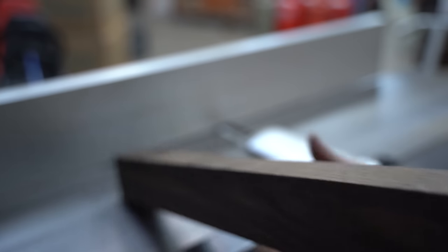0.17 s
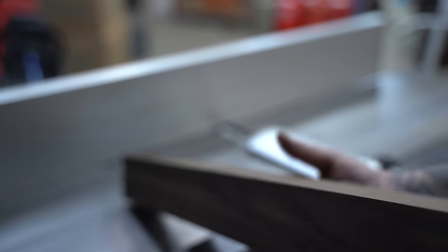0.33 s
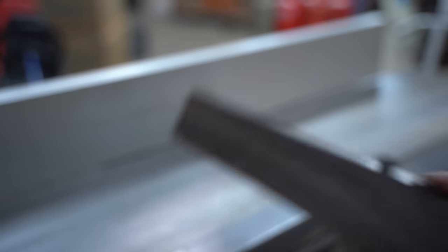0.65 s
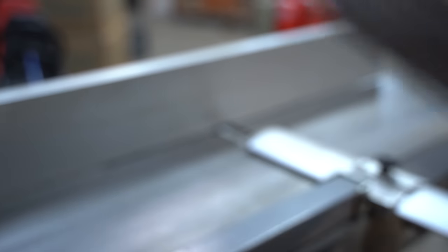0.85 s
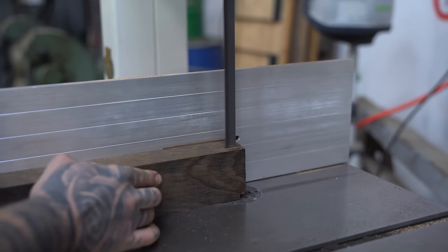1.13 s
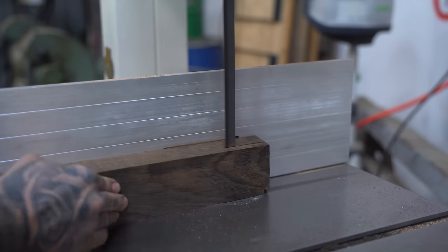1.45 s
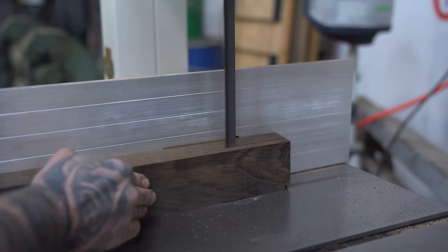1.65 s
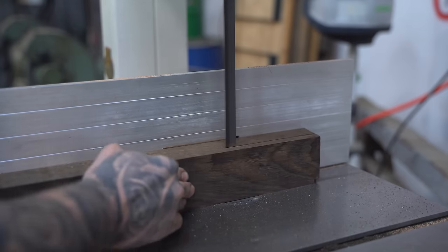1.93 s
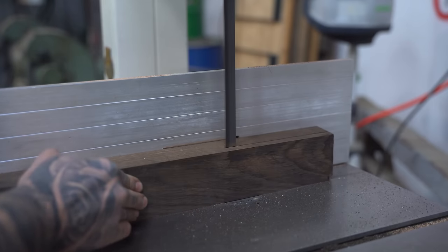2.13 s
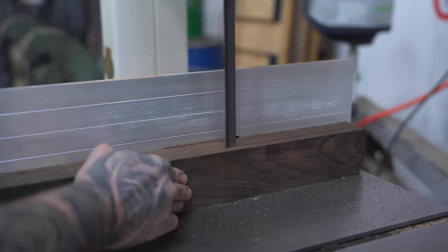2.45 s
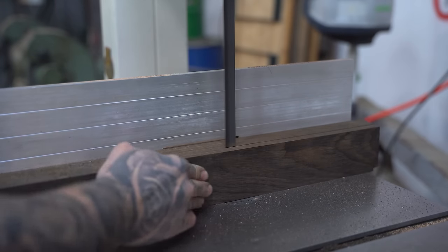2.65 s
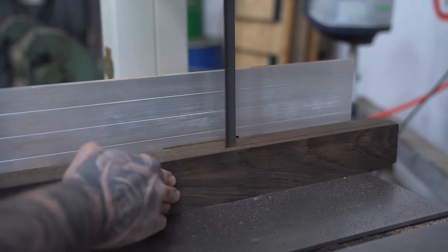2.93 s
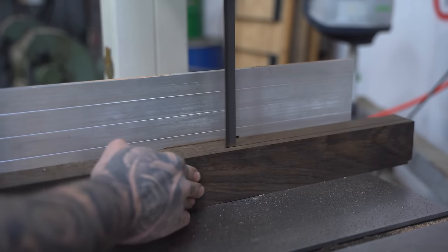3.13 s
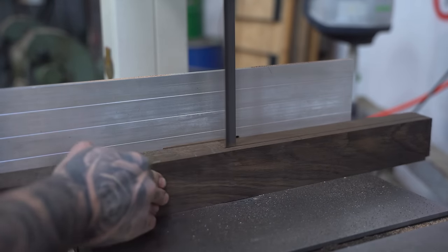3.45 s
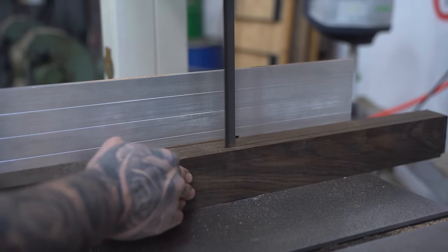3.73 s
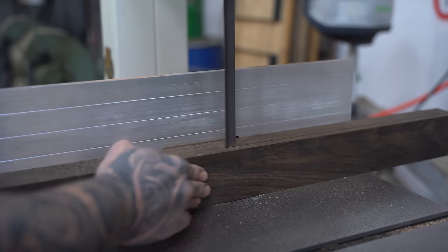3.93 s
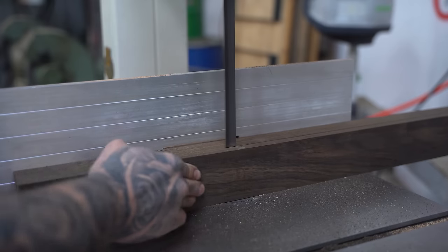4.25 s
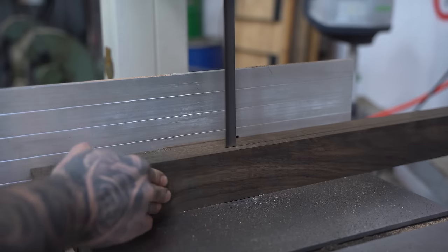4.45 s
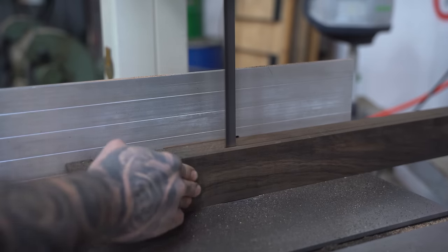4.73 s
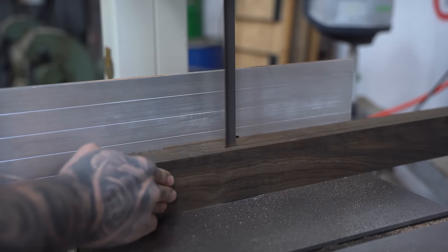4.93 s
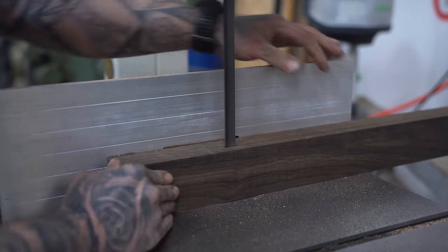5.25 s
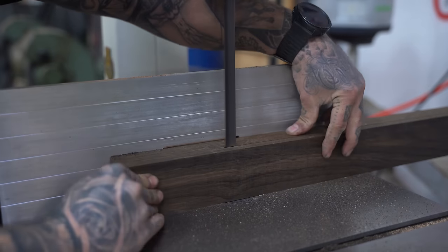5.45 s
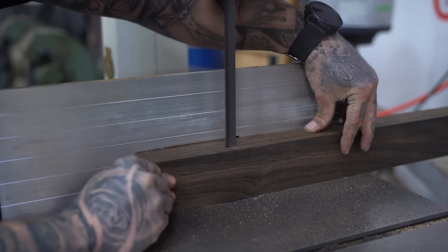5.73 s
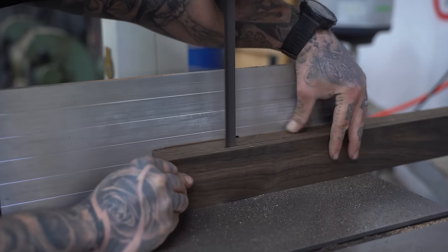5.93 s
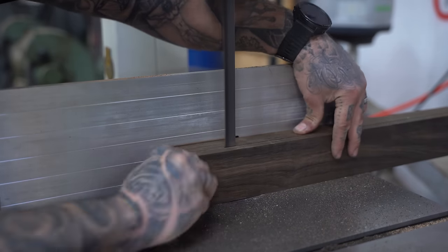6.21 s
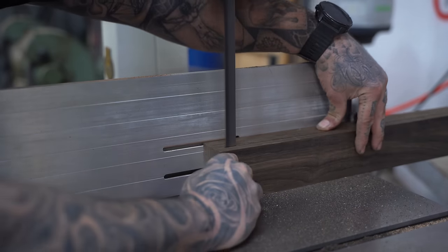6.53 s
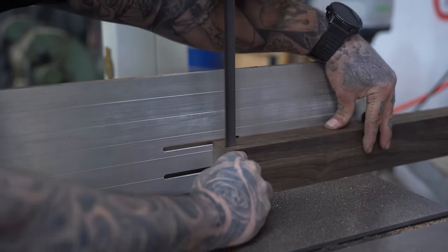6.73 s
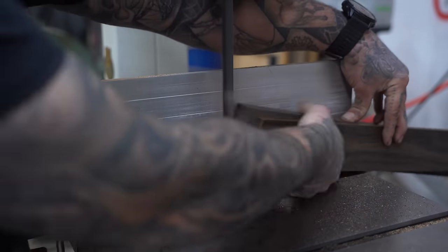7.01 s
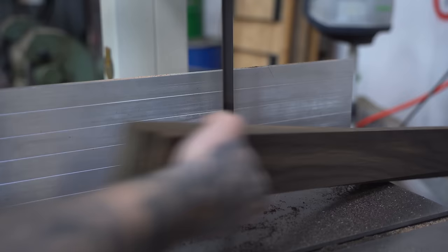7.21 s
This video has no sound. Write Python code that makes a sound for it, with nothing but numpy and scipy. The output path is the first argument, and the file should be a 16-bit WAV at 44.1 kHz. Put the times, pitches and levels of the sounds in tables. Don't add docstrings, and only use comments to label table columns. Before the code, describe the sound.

For the first 1.15 seconds a workshop extractor hums quietly and widely, with airy noise, faint unsteady whines and a duct boom swelling from about 0.6. Then it cuts abruptly to a much closer, nearly central bandsaw. Its teeth scrape a hardwood board with a bright, dense rasp, a singing blade near 6 kHz, hissing guides and spitting chips. Two harder bites in every blade turn make a fast, regular ticking flutter. Pushes are separated by short dips near 1.5, 2.1, 2.7, 3.3, 3.8, 4.0, 4.4 and 4.9, with slight chirps and a lingering whistle; faint board moans glide beneath. From 5.15 to 5.5 the cut eases and snags roughly during a grip change, and low blade hum blooms. Softer-ticking strokes continue, dipping at 5.9 and 6.3. Around 6.8 the scrape falls away, leaving rushing air, wheels and wavering motor tones until the end, about 7.4.

```python
import sys
import numpy as np
from scipy import signal
from scipy.fft import rfft, irfft, next_fast_len
from scipy.io import wavfile
from scipy.ndimage import uniform_filter1d

SR = 44100
rng = np.random.default_rng(int(sys.argv[2]) if len(sys.argv) > 2 else 0)


def gain_from_db(level_db):
    decades = np.asarray(level_db, float) / 20
    return 10 ** decades


def waveform_to_disk(signal):
    frames = np.transpose(np.atleast_2d(signal))
    scaled = np.clip(frames, -1, 1) * 32767
    samples = np.round(scaled).astype(np.int16)
    wavfile.write(sys.argv[1], SR, samples)


N = 325105
PADDED = next_fast_len(N + 4096)

# frequency in Hz, density in dB per Hz.
SHOP_AIR = [(24, -73), (40, -65), (91, -17), (379, -9.5), (1060, -13.5), (1290, -7), (1580, -11),
            (1790, -16.5), (1970, -27), (2290, -16.5), (2600, -15), (3090, -18), (4070, -14), (6230, -22),
            (15700, -38)]
# frequency in Hz, level in dB.
SHOP_WHINES = [(371.4, -69.5), (1297, -65), (1986, -67), (2019, -64.5), (2692, -69.5), (3973, -63),
               (4963, -69), (7940, -75)]
# time in seconds, level in dB.
DUCT_SWELL = [
    (0.0, -60),
    (0.4, -59),
    (0.63, -52.5),
    (1.14, -52.5),
]
# frequency in Hz, likeness from -1 to 1.
SHOP_LIKENESS = [(300, .98), (600, .76), (1000, .48), (2000, .3), (3100, .2), (4200, .45), (6000, .12),
                 (15000, .15)]
# frequency in Hz, balance in dB.
SHOP_BALANCE = [(60, -1), (180, 0), (550, 2.5), (1650, 3), (4970, 0.5), (15000, 5)]

# frequency in Hz, density in dB per Hz.
IDLE_AIR = [(35, -97), (60, -54), (455, -21.5), (549, -36), (588, -48), (676, -17.5), (895, -14),
            (1640, -6), (2550, -6), (2740, -9), (5380, -10), (8180, -8), (15700, -14.5)]
# frequency in Hz, likeness from -1 to 1.
SAW_LIKENESS = [(100, 0.99), (300, 1), (4400, 0.99), (5800, 0.71), (10600, 0.78), (12200, 0.47),
                (14200, 0.62), (15300, .4)]
# frequency in Hz, waver in Hz, flutter in dB, level in dB,
# share of pitch lost under load.
MOTOR_TONES = [(421, 3.74, 2.5, -84, 0.0018), (453, 9.95, 3.5, -82.5, 0), (489, 5.97, 5, -83.5, 0.0028),
               (601.6, .3, -2.2, -74.5, 0.00066), (929, 2.86, 3.5, -71.5, 0.038), (1284, 5, 2.5, -73, .03),
               (1197, 0.81, 4, -71, 0.00093), (2004, 2.15, 0, -67.5, 0), (2126, 2.1, -4, -79, 0.0038),
               (2320, 4.8, 3, -68, 0.0013), (2574, 2.4, 1.8, -64, 0.00037), (797, 3.6, 1.5, -83.5, 0.0018),
               (15640, 30, -5, -73, 0.004), (4240, 3.8, 9, -78.5, 0), (8150, 15, 3.5, -70.5, 0.0049),
               (11978, 5, 3, -84.5, 0), (12300, 5.8, 1, -76, 0.0057)]

# start in seconds, blade song above its rule in dB,
# climb of the song over the stroke in dB, scrape level in dB, pan in dB.
STROKES = [(1.15, 3, -5, -35, .3), (1.5, 0, -5, -36, 0), (2.14, -2, 8, -34, 1), (2.74, 1.5, -6, -34, -.7),
           (3.3, -1, 1, -35.5, 0), (3.82, -5, 9, -37.5, -0.5), (4.02, -3, -4, -36, -.5),
           (4.42, 2, 6, -35, -.5), (4.9, -2, -5, -35.5, -1.5), (5.4, -1, 12, -36.5, -1.5),
           (5.95, -1.5, -4, -36, -1.5), (6.31, -3, 0, -35, -1.5)]
# time in seconds, push as board level in dB, chip spray in dB,
# pitch of the contact on the guides in Hz.
FEED = [(1.15, -47.5, -31, 7400), (1.3, -42.5, -36.5, 7430), (1.43, -41, -37, 7500),
        (1.68, -40.5, -38, 7550), (2.08, -45, -33, 7470), (2.45, -46, -36, 8130), (2.8, -45, -37.5, 7600),
        (3.24, -45.5, -34, 7480), (3.75, -45.5, -32, 7150), (4.2, -41, -37, 6650), (4.5, -46, -36, 7500),
        (5.12, -46, -32.5, 7620), (5.55, -47, -36.5, 8100), (5.87, -42.5, -38, 7720),
        (6.08, -41, -39.5, 7170), (6.25, -44.5, -39.5, 7130), (6.4, -39, -37, 7560),
        (6.74, -51.5, -34.5, 6950)]
# pressure eases in seconds, back in full in seconds, rise in seconds,
# depth in dB, blade ring in dB.
PAUSES = [(1.445, 1.537, 0.043, -15.5, -48), (2.111, 2.176, 0.04, -11.5, -43),
          (2.707, 2.768, 0.031, -11.5, -66), (3.259, 3.32, 0.014, -16, -53),
          (3.769, 3.833, 0.0067, -17, -52.5), (3.991, 4.052, 0.033, -7, -73),
          (4.373, 4.443, 0.028, -12.5, -64), (4.865, 4.919, 0.014, -14, -52.5),
          (5.145, 5.306, 0.11, -12.5, -71.5), (5.273, 5.501, 0.068, -20.5, -62),
          (5.906, 5.982, .025, -4.5, -70), (6.266, 6.321, 0.0084, -17.5, -53)]
# (seconds, seconds, seconds, dB, dB).
CUT_END = (6.788, 7.6, .1, -32, -50)
# time in seconds, level in dB, half length in seconds.
SNAGS = [
    (5.198, 3, .006),
    (5.219, 5, .006),
    (5.248, 9, .007),
    (5.325, 8, .004),
    (5.419, 13, .01),
    (5.458, 8, .009),
    (5.485, 2, .006),
    (5.537, 2, .007),
]

# frequency in Hz, density in dB per Hz.
CUT_BED = [(410, -66), (700, -60), (1210, -9.5), (1880, -15.5), (2510, -4), (3520, -10), (5760, -13.5),
           (6310, -17), (7480, 3), (9450, -3.5), (15700, -2.5)]
# frequency in Hz, width in Hz, level in dB, share of a pause felt.
BOARD_LOW = [(1090, 60, -8, .5), (1230, 70, -9, .5), (2330, 140, -6, .7)]
# frequency in Hz, width in Hz, level in dB, share of a pause felt.
BOARD_HIGH = [(3305, 58, 0, 0.37), (4510, 210, 0, 0.68), (4973, 114, 2, 1), (5150, 80, 2, 1)]
# frequency in Hz, width in Hz, level in dB, share of a pause felt.
GUIDES = [(7000, 88, 14.5, 0.84), (7150, 87, 12, 1), (7313, 84, 10.5, 1), (7600, 62, -13, 0.87),
          (7970, 130, 11, 0.94), (8124, 103, 14.5, 0.88), (10320, 480, -4.5, 0.42), (11370, 205, 2, 1)]
# frequency in Hz, width in Hz, level in dB, share of a pause felt.
CHIPS = [(13620, 200, 5, 1), (14200, 420, 12, 1), (15600, 350, 8, 1)]
# frequency in Hz, width in Hz, level in dB,
# gain in dB when the board is held from behind, peak of that gain in seconds.
BLADE_HUM = [(1712, 23, -65.5, 10, 5.83), (2554, 23, -63.5, 12, 5.63)]
# frequency in Hz, width in Hz, depth from 0 to 1.
HOLLOWS = [(1885, 150, .7), (2140, 100, .45), (2790, 200, .6), (3480, 220, .75), (3750, 120, .4),
           (6350, 400, .3), (9750, 600, .3), (12600, 700, .3)]
# frequency in Hz, level in dB, share of the sag.
FREE_BLADE = [(1725, -2, 1), (2580, -6, .2)]
# start in seconds, length in seconds, from Hz, to Hz, level in dB.
MOANS = [
    (1.92, 0.11, 240, 236, -92),
    (2.298, 0.58, 240.4, 402, -86.5),
    (3.133, 0.38, 274, 315, -85.5),
    (3.616, 0.16, 290, 277, -91),
    (4.036, .14, 237, 225, -85),
]


def rms_one(x):
    return x / np.sqrt(np.mean(x ** 2) + 1e-20)


def in_time(rows):
    s, *columns = np.transpose(rows)
    return [np.interp(np.arange(N) / SR, s, c) for c in columns]


def drift(rate):
    r = np.exp(-80 * np.pi * rate / SR)
    white = rng.standard_normal(N // 40 + 2002)
    slow = signal.lfilter([1], [1, -2 * r, r * r], white)[2000:]
    return np.interp(np.arange(N) / 40, np.arange(len(slow)), rms_one(slow - slow.mean()))


def on_bins(points):
    hz = np.maximum(np.fft.rfftfreq(PADDED, 1 / SR), 1)
    return np.interp(np.log(hz), np.log(np.array(points)[:, 0]), np.array(points)[:, 1])


def colour(x, gain):
    return irfft(rfft(x, PADDED) * gain, PADDED)[..., :N]


def spread(pair, likeness, lag_s):
    alike = np.clip(on_bins(likeness), -1, 1)
    mid, side = rfft(pair, PADDED) * np.sqrt([1 + alike, 1 - alike]) / np.sqrt(2)
    late = np.exp(-2j * np.pi * np.fft.rfftfreq(PADDED, 1 / SR) * lag_s)
    return irfft([mid + side, (mid - side) * late], PADDED)[:, :N]


def resonance(x, hz, width_hz):
    r = np.exp(-np.pi * width_hz / SR)
    zeros = np.array([1, 0, -1]) * (1 - r * r) / 2
    return signal.lfilter(zeros, [1, -2 * r * np.cos(2 * np.pi * hz / SR), r * r], x)


def gliding(x, hz, width_hz):
    turn = np.exp(2j * np.pi * np.cumsum(hz) / SR)
    r = np.exp(-np.pi * width_hz / SR)
    return 2 * np.real(turn * signal.lfilter([1 - r], [1, -r], x * np.conj(turn)))


def band(x, lo_hz, hi_hz):
    sos = signal.butter(3, [lo_hz, min(hi_hz, .45 * SR)], "band", fs=SR, output="sos")
    return signal.sosfilt(sos, x)


def shop():
    air = gain_from_db(-49) * rms_one(colour(rng.standard_normal((2, N)), gain_from_db(on_bins(SHOP_AIR))))
    boom = gain_from_db(in_time(DUCT_SWELL)[0] - 4.5) * rms_one(resonance(rng.standard_normal((2, N)), 362, 61))
    white = rng.standard_normal((2, N))
    whines = sum(gain_from_db(db) * rms_one(resonance(white, hz, 3.1)) for hz, db in SHOP_WHINES)
    balance = gain_from_db(on_bins(SHOP_BALANCE) / 2 * [[1], [-1]])
    return colour(spread(air + boom + whines, SHOP_LIKENESS, lag_s=8 / SR), balance)


def idling(load):
    air = rms_one(colour(rng.standard_normal((2, N)), gain_from_db(on_bins(IDLE_AIR))))
    out = gain_from_db(-52 + 1.2 * drift(13)) * air
    for hz, waver_hz, flutter_db, db, sag in MOTOR_TONES:
        phase = 2 * np.pi * np.cumsum(hz * (1 - sag * load) + waver_hz * drift(10.6)) / SR
        out[0] += np.sqrt(2) * gain_from_db(db + flutter_db * drift(9.9)) * np.sin(phase)
    return out


def strokes():
    t = np.arange(N) / SR
    start, song_db, climb_db, *columns = np.transpose(STROKES)
    which = np.clip(np.searchsorted(start, t) - 1, 0, len(start) - 1)
    progress = np.interp(t, [*start, CUT_END[0]], np.arange(len(start) + 1)) % 1
    levels = [song_db[which] + climb_db[which] * (progress - .5)] + [c[which] for c in columns]
    return [uniform_filter1d(c, size=2000) for c in levels] + [np.sin(np.pi * progress)]


def teeth(proud_db, second_db, fade_s, rough_db, grain_db):
    t = np.arange(N) / SR
    turn_s = 1 / 17.675
    since = (t - 1.1645) % turn_s
    half = 0.44 * turn_s
    first = proud_db * np.exp(-since / fade_s)
    second = second_db * np.exp(-(since - half) / fade_s)
    bite_db = np.where(since < half, first, second)
    bite_db *= np.clip(1 + .3 * drift(6), .3, 1.4)
    bite_db *= np.interp(t, [5.2, 5.5], [1, .5])
    tick_db = bite_db * .3 * (since < .0012)
    level_db = bite_db + tick_db + rough_db * drift(8.4) + grain_db * drift(300)
    return gain_from_db(level_db) * rng.standard_normal((2, N))


def body(scrape, modes, bed, lost_db, patchy_db, favour_db=lambda hz: 0):
    rings = [gain_from_db(db + favour_db(hz) + patchy_db * drift(5.7)) * resonance(scrape, hz, width_hz)
             for hz, width_hz, db, felt in modes]
    loudness = uniform_filter1d(np.mean((bed + sum(rings)) ** 2, axis=0), size=12000)
    eased = sum(gain_from_db(mode[3] * lost_db) * ring for ring, mode in zip(rings, modes))
    return (gain_from_db(lost_db) * bed + eased) / np.sqrt(loudness)


def board_tones(scrape, bed, board_db, lost_db):
    def hard_push(hz):
        return (hz > 4700) * np.minimum(1.26 * (board_db + 47.5), 7)

    low = body(scrape, BOARD_LOW, gain_from_db(1.0) * band(bed, 940, 3300), lost_db, patchy_db=3.0)
    high = body(scrape, BOARD_HIGH, gain_from_db(10) * band(bed, 2926, 5620), lost_db, 2.44, hard_push)
    return gain_from_db(-53.0 + 0.1 * (board_db + 54.5)) * low + gain_from_db(board_db) * high


def blade_song(scrape, bed, board_db, extra_db, arch, lost_db):
    push_db = board_db + 47
    song_db = -46 + 0.97 * push_db + 3 * arch + extra_db
    song_hz = 5950 - 12 * push_db - 70 * arch
    line = gliding(gliding(scrape, song_hz + 15 * drift(20), 45), song_hz, 220)
    breath = gain_from_db(-3.5 + 0.55 * push_db) * rms_one(band(bed, 5674, 6160))
    return gain_from_db(song_db + 2.0 * lost_db) * rms_one(breath + rms_one(line))


def guide_scrape(scrape, bed, contact_hz, lost_db):
    def nearness(hz):
        return (hz < 9000) * np.maximum(-9 * ((hz - contact_hz) / 400) ** 2, -15)

    hiss = gain_from_db(5) * band(bed, 6460, 12470) + gain_from_db(-5) * band(scrape, 7230, 8020)
    return body(scrape, GUIDES, hiss, lost_db, 5.9, nearness)


def chip_spray(scrape, bed, chips_db, lost_db):
    def thick_spray(hz):
        return (hz < 15000) * 0.63 * (chips_db + 41.5)

    bursts = scrape * gain_from_db(2.9 * drift(65))
    return body(bursts, CHIPS, gain_from_db(14) * band(bed, 12900, 16500), lost_db, 2.2, thick_spray)


def blade_whistle(scrape, scrape_db, lost_db):
    hz = 8310 - 7 * np.maximum(lost_db, -14) + 35 * drift(7)
    whistle = rms_one(band(gliding(scrape, hz, 49), 7780, 8610))
    deep_pause_db = 1.4 * np.minimum(lost_db + 14.5, 0)
    level_db = scrape_db - 12.5 + 2.3 * drift(4) + 0.12 * lost_db + deep_pause_db
    return whistle * gain_from_db(level_db) * (np.arange(N) / SR < 6.81)


def blade_hum(scrape, lost_db):
    t, hum = np.arange(N) / SR, 0
    pause_shares = (0.25, 0)
    for (hz, width_hz, db, held_db, peak_s), feels in zip(BLADE_HUM, pause_shares):
        clamp_db = held_db * np.exp(-((t - peak_s) / 0.38) ** 2)
        tone = rms_one(resonance(resonance(scrape, hz, width_hz), hz, 100))
        hum = hum + gain_from_db(db + clamp_db + feels * lost_db + 0.57 * drift(2.9)) * tone
    return hum


def cut(lost_db):
    board_db, chips_db, contact_hz = in_time(FEED)
    extra_db, scrape_db, pan_db, arch = strokes()
    scrape = teeth(proud_db=3.3, second_db=2.6, fade_s=.012, rough_db=1.0, grain_db=0.83)
    bed = colour(scrape, gain_from_db(on_bins(CUT_BED)))
    out = board_tones(scrape, bed, board_db, lost_db)
    out = out + blade_song(scrape, bed, board_db, extra_db, arch, lost_db)
    out += gain_from_db(scrape_db) * guide_scrape(scrape, bed, contact_hz, lost_db)
    out += gain_from_db(chips_db) * chip_spray(scrape, bed, chips_db, lost_db)
    out += blade_whistle(scrape, scrape_db, lost_db) + blade_hum(scrape, lost_db)
    for hz, width_hz, depth in HOLLOWS:
        out = out - np.clip(depth, 0, 1) * resonance(out, hz, width_hz)
    load = np.clip((scrape_db + lost_db + 55.5) / 14, 0, 1)
    return band(out, 397, 22000), pan_db, load


def pauses():
    t, lost_db, shake = np.arange(N) / SR, np.zeros(N), np.zeros(N)
    ease_s = 0.0326
    for ease, full, rise_s, depth_db, ring_db in PAUSES + [CUT_END]:
        bite, low = full - rise_s, ease + 0.024
        times = [ease, ease + .013, min(ease + ease_s, bite - .001), min(ease + 3 * ease_s, bite), bite, full]
        lost_db += depth_db * np.interp(t, times, [0, 0.535, .9, 1, 1, 0])
        rebite = (rise_s < .0135) * (t > full) * np.exp(-np.abs(t - full) / 0.022)
        lost_db -= 0.11 * depth_db * rebite
        shake_times = [low - .018, low - .008, low + .008, low + .026]
        shake += gain_from_db(ring_db + 2) * np.interp(t, shake_times, [0, 1, .8, 0])
    for s, db, half_s in SNAGS:
        lost_db += db * np.clip(1 - np.abs(t - s) / half_s, 0, 1)
    return lost_db, shake


def freed_blade(shake):
    t, chirp = np.arange(N) / SR, 0
    ease = np.array([0] + [p[0] for p in PAUSES + [CUT_END]])
    since = t - ease[np.searchsorted(ease, t, side="right") - 1]
    sag = .07 * np.exp(-since / .03)
    for hz, db, share in FREE_BLADE:
        phase = 2 * np.pi * np.cumsum(hz * (1 - share * sag) + 25 * drift(40)) / SR
        chirp = chirp + gain_from_db(db + 2.0 * drift(30)) * np.sin(phase)
    return shake * chirp


def moans():
    out = np.zeros(N)
    for s, length_s, from_hz, to_hz, db in MOANS:
        t = np.arange(int(length_s * SR)) / SR
        hz = from_hz + (to_hz - from_hz) * t / length_s
        swell = gain_from_db(db) * np.sin(np.pi * t / length_s) ** 0.51
        first = int(s * SR)
        out[first:first + len(t)] += swell * np.sin(2 * np.pi * np.cumsum(hz) / SR)
    return np.sqrt(2) * out * gain_from_db(4.2 * drift(9))


def scene():
    lost_db, shake = pauses()
    cutting, pan_db, load = cut(lost_db)
    cutting[0] += freed_blade(shake) + moans()
    load = uniform_filter1d(load, size=4000)
    saw = spread(cutting + idling(load), SAW_LIKENESS, lag_s=.3 / SR)
    saw = saw * gain_from_db(load * pan_db / 2 * [[1], [-1]])
    near = np.clip((np.arange(N) / SR - 1.147) / 0.0015, 0, 1)
    return (1 - near) * shop() + near * saw


def top_cut(x):
    return signal.sosfilt(signal.butter(12, 16670, fs=SR, output="sos"), x)


def record(dry):
    rounded = 0.39 * np.tanh(dry / 0.41)
    top = signal.ellip(10, .5, 62, 15690, fs=SR, output="sos")
    return top_cut(signal.sosfilt(top, rounded))


dry = scene()
out = record(dry)
waveform_to_disk(out)
```